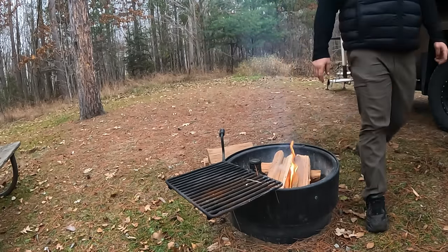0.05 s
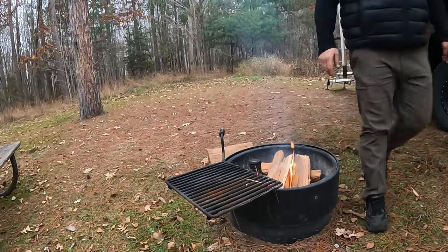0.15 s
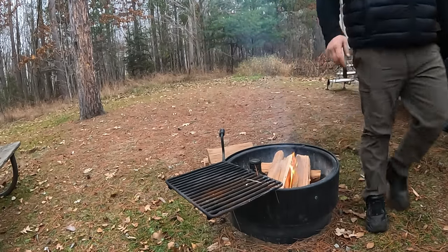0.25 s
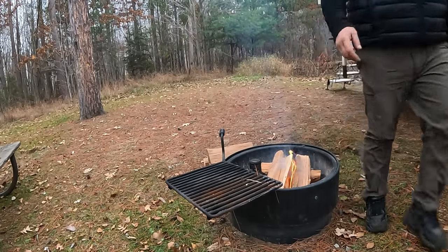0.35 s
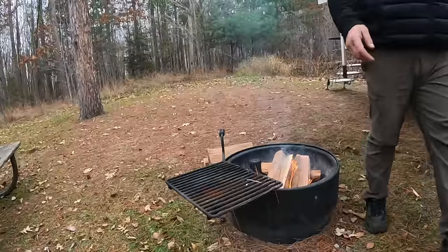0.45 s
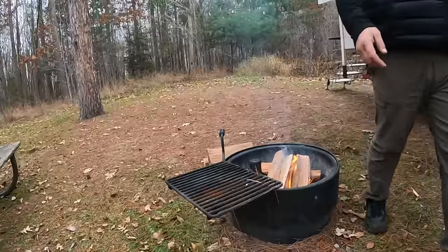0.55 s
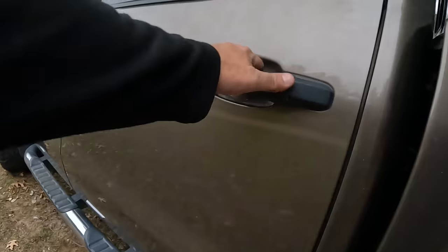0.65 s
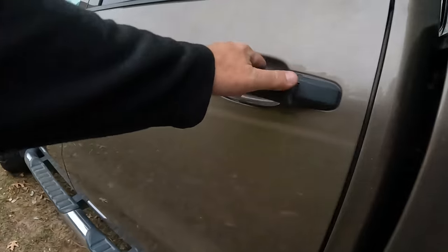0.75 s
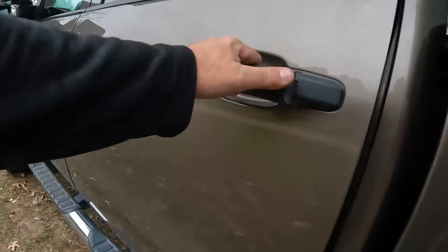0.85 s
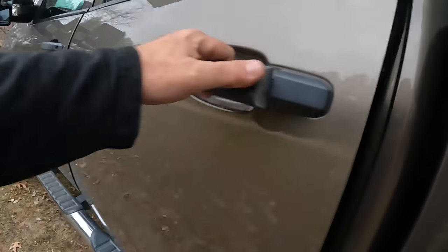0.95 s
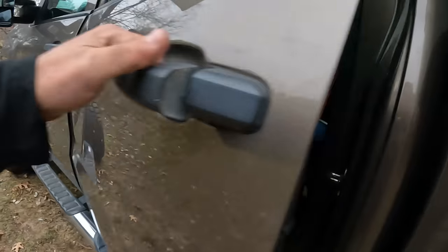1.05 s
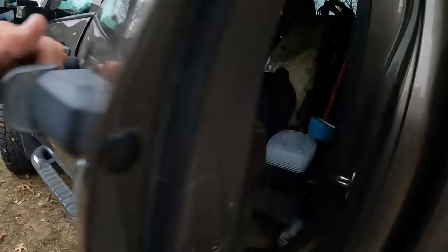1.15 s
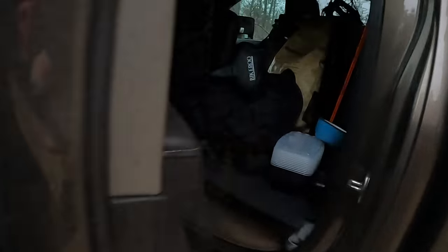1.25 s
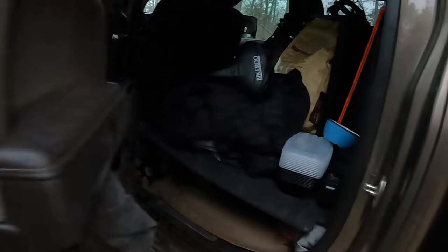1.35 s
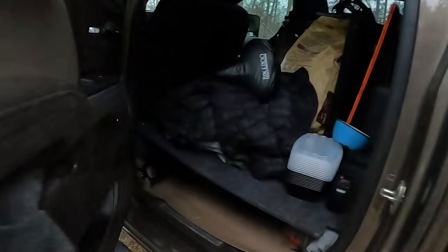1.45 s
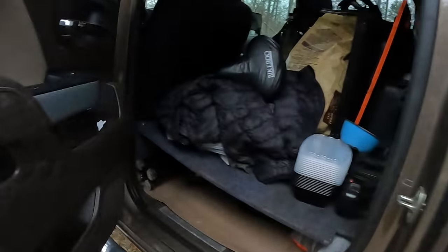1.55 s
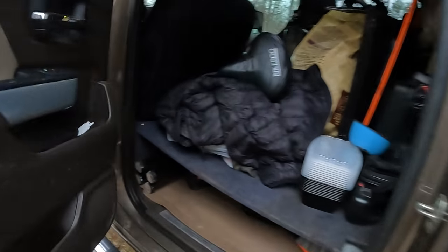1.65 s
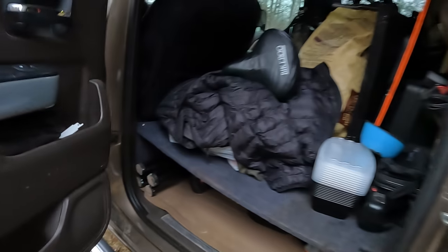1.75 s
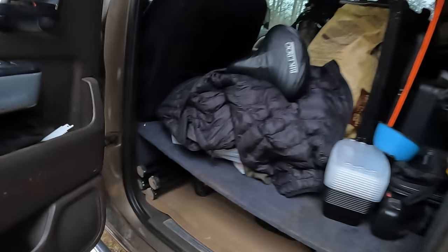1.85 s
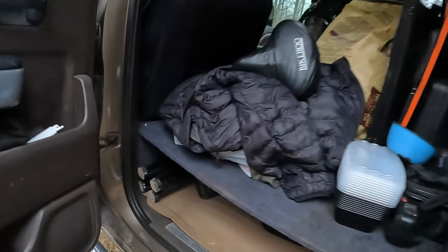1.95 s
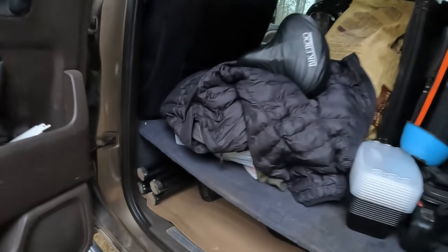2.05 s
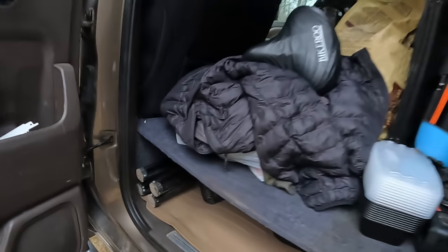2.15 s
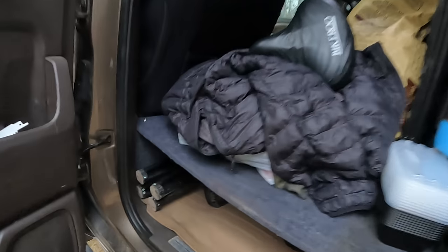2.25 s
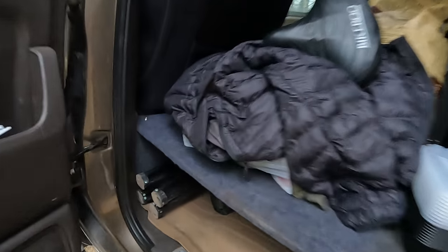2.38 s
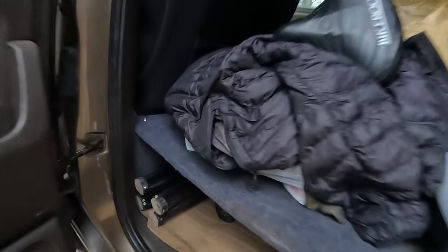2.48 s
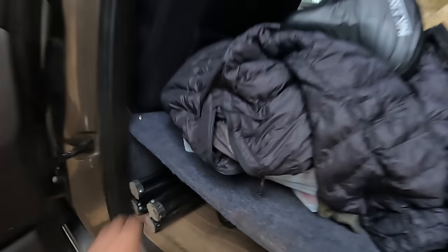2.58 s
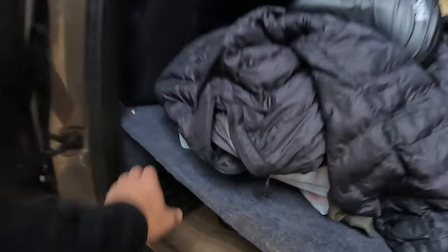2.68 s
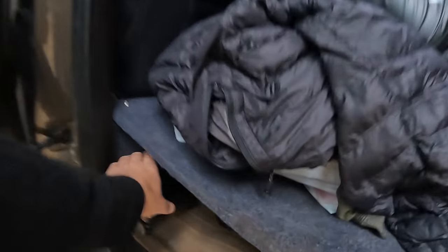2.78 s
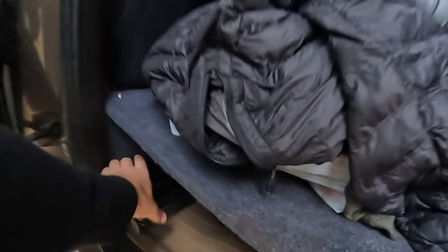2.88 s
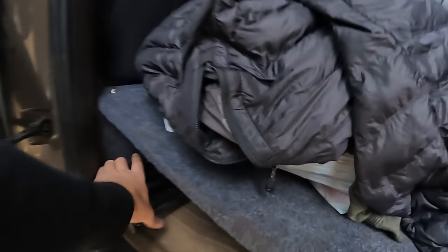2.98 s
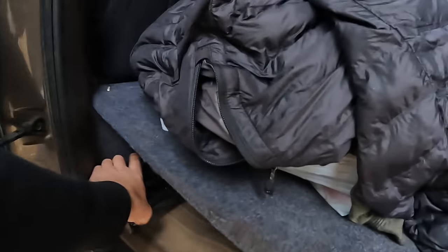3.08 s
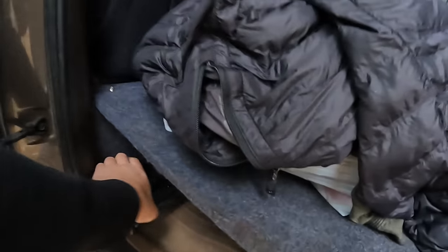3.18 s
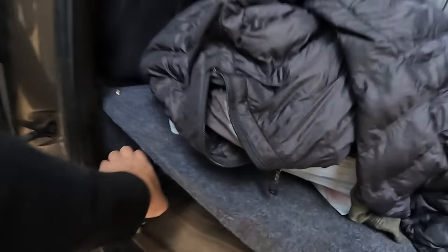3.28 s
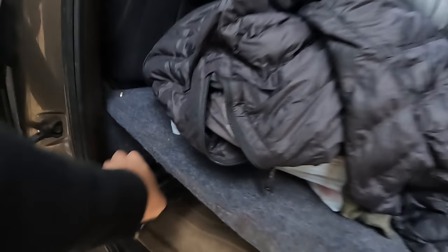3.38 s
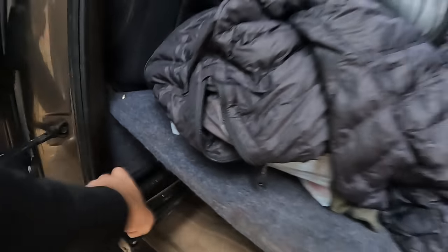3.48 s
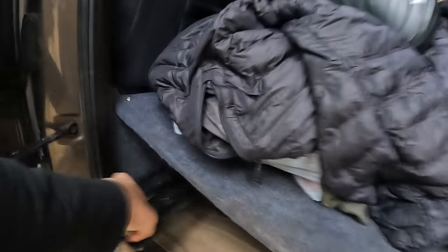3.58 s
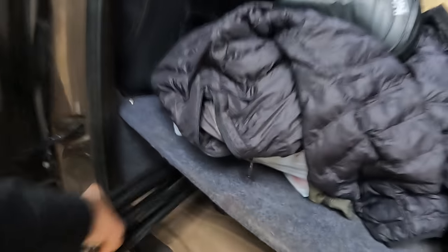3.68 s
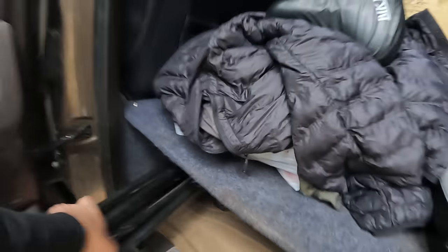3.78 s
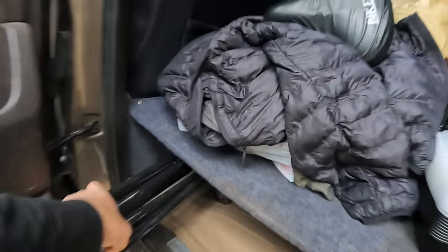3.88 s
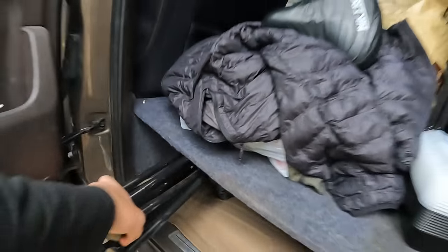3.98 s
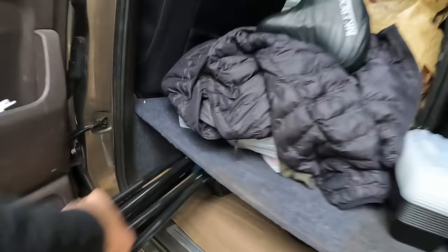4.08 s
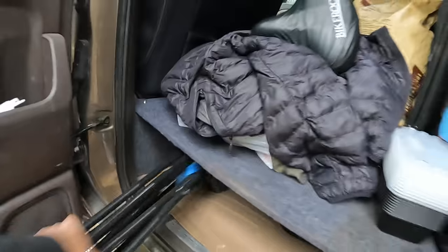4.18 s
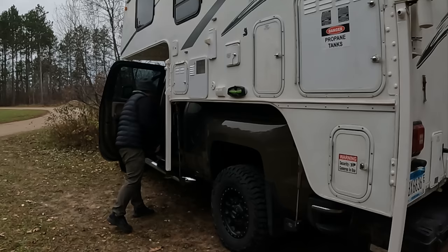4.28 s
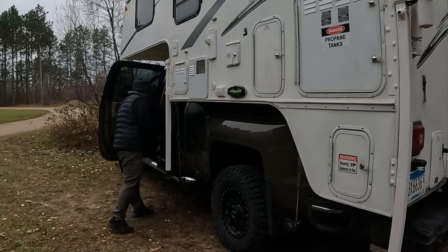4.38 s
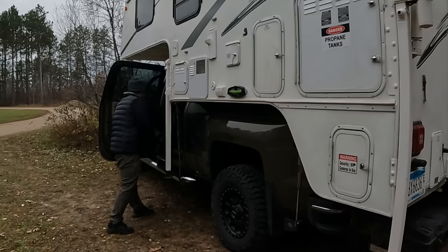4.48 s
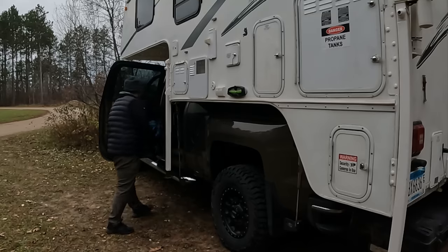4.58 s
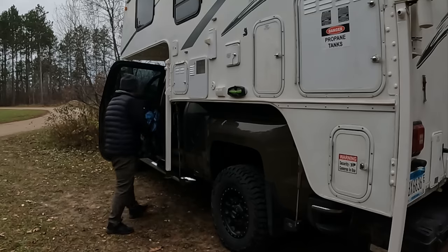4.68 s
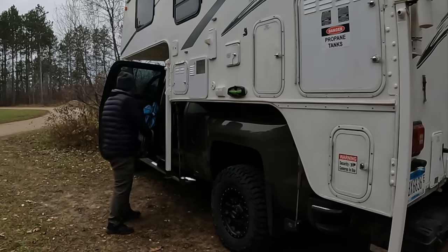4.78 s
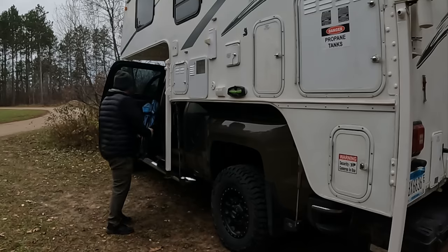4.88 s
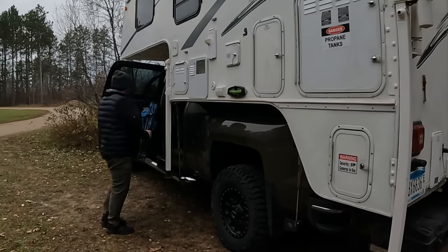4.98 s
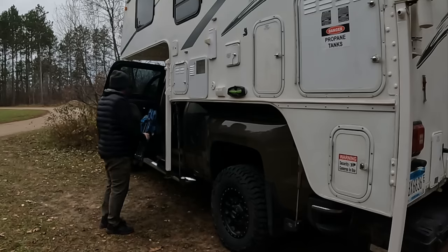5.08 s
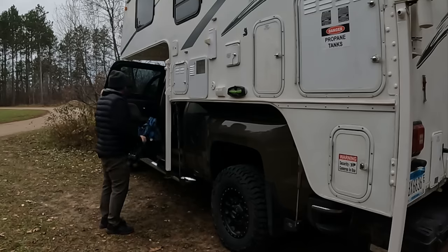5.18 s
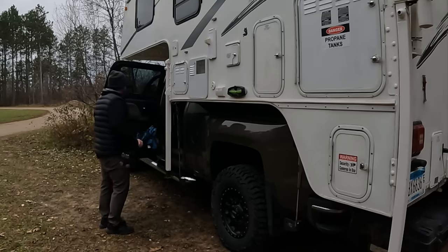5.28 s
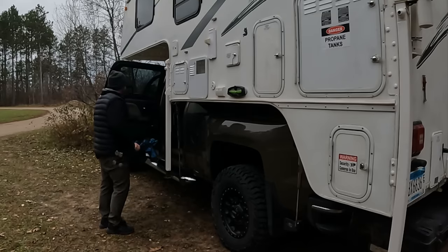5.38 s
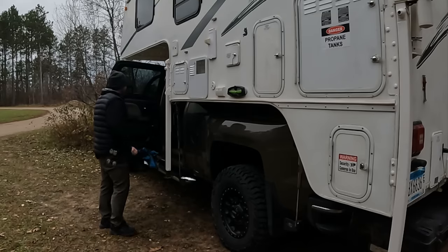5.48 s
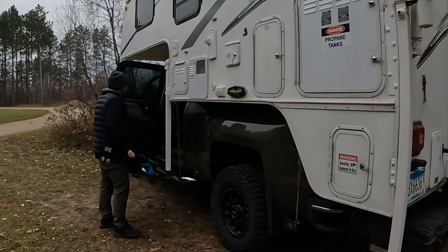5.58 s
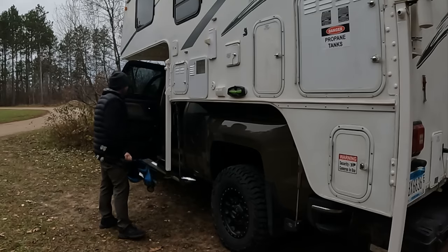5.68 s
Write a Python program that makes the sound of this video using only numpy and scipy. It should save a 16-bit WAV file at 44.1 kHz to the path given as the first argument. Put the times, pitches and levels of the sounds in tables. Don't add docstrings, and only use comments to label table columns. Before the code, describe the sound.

A vehicle door unlatches with a heavy clunk, swings to its stop, then metal poles are dragged out, bumping and clacking amid rustling cloth.

```python
import sys
import numpy as np
from scipy import signal
from scipy.fft import rfft, irfft
from scipy.io import wavfile
from scipy.ndimage import uniform_filter1d

SR = 44100
rng = np.random.default_rng(int(sys.argv[2]) if len(sys.argv) > 2 else 0)


def int16_out(signal):
    q = np.round(np.clip(np.atleast_2d(signal).T, -1, 1) * 32767)
    wavfile.write(sys.argv[1], SR, q.astype(np.int16))


def decibels_to_gain(level_db):
    exponent = np.asarray(level_db, float) / 20
    return 10 ** exponent


N = 253178

# mode_hz, level_db, t60_s
DOOR = [(155, -4, 0.11), (162.3, -13, 0.17), (215, 7.5, 0.038), (301, 0, 0.066), (423, -2.5, 0.079),
        (580, 9, 0.022), (741, 0.5, 0.037), (810, 5.5, 0.04), (1240, -5, 0.083), (1323, 16.5, 0.014),
        (1670, 0, 0.032), (1890, 14, 0.019), (2300, 10, 0.055), (2970, 15.5, 0.016), (3780, -19, 0.012),
        (5000, 24, 0.061), (5300, -6, 0.041), (6300, -8, 0.048), (7400, -6, 0.026), (9300, 7, 0.019),
        (11500, -16, .015)]
# mode_hz, level_db, t60_s
POLES = [(185, 0, .08), (245, 0, .06), (320, -1, .09), (375, 2, .13), (480, 0, .04), (700, -4, .03),
         (1100, -3, .03), (1400, -1, .022), (1550, -6, .025), (2200, -4, .02), (2650, -2, .02),
         (3300, 0, .025), (4400, -2, .02), (4900, -4, .04), (6200, -3, .02), (7800, -1, .02),
         (10300, -3, .02), (12500, -7, .015), (9300, -6, .025), (8700, -8, .02)]
HEAVY_HZ, POLE_HEAVY_HZ, BRIGHT_HZ = (115, 500, 1800), (140, 500, 1800), (1800, 5500, 11500)
TICK_SOFTNESS = 0.6


def band(x, lo_hz, hi_hz, order=2):
    return signal.sosfilt(signal.butter(order, [lo_hz, hi_hz], "band", fs=SR, output="sos"), x)


def unit(x):
    return x / np.sqrt(np.mean(x ** 2))


def curve(s, values):
    return np.interp(np.arange(N) / SR, s, values)


def on_log(hz, table):
    table_hz, table_db = np.transpose(table)
    return np.interp(np.log(hz), np.log(table_hz), table_db)


def walk(rate_hz):
    k = int(SR / rate_hz)
    held = np.repeat(rng.standard_normal(N // k + 1), k)
    return 1.3 * uniform_filter1d(uniform_filter1d(held, k), k)[:N]


def swells(table, roundness):
    hop = 64
    s, db, rise_s, fall_s, colour_db = np.transpose(table)[:, :, None]
    late_s = np.arange(0, N, hop) / SR - s
    db = db - 10 * np.abs(late_s / np.where(late_s < 0, rise_s, fall_s)) ** roundness
    return [(decibels_to_gain(v) ** 2).sum(axis=0).repeat(hop)[:N] for v in (db, db + colour_db)]


def blows(table, body, edges_hz, contact_ms, rattle_db, dense_db, dense_decay, reach, ring=1, softness=1):
    softer_ms_per_db = 0.2648
    length = 9000
    out, t = np.zeros(N + length), np.arange(length) / SR
    hz, db, t60_s = np.transpose(body)[:, :, None]
    heard = ((hz >= edges_hz[0]) & (hz < edges_hz[-1]))[:, 0]
    hz, db, t60_s = hz[heard], db[heard], t60_s[heard]
    dying = decibels_to_gain(db) * np.exp(-np.log(1000) * t / np.abs(ring * t60_s))
    for s, low_db, low_hz, high_db, high_hz in table:
        sign = np.sign(rng.standard_normal(hz.shape))
        detune = 1 + 0.027 * rng.standard_normal(hz.shape)
        modes = dying * sign * np.sin(2 * np.pi * hz * detune * t)

        length_ms = contact_ms - softness * softer_ms_per_db * (max(low_db, high_db) + 8.5)
        fade = t[:3000] / (max(length_ms, 0.2) / 1000)
        contact = rng.standard_normal(len(fade)) * decibels_to_gain(rattle_db) * np.sqrt(fade) * np.exp(-fade)
        contact[0] += 1

        hiss = rng.standard_normal(length)
        start = int(s * SR)
        parts = zip((low_db, high_db), (low_hz, high_hz), edges_hz, edges_hz[1:])
        for level_db, place_hz, lo, hi in parts:
            near = ((hz >= lo) & (hz < hi)) / (1 + (np.log2(hz / place_hz) / reach) ** 2)
            dense_top_hz = min(place_hz * (1 + 2 * reach), 11500)
            dense = decibels_to_gain(dense_db) * unit(band(hiss, place_hz / (1 + reach), dense_top_hz, order=1)) / 10
            height = hi / edges_hz[1]
            dense = dense * height ** 0.54 * np.exp(-t * dense_decay * np.sqrt(height))
            sound = signal.fftconvolve(contact, (near * modes).sum(axis=0) + dense)[:length]
            sound = band(sound, lo * 0.7, min(hi * 1.014, 18000), order=3)
            peak = np.sqrt(uniform_filter1d(sound ** 2, size=220).max())
            out[start:start + length] += sound * decibels_to_gain(level_db - 4.0) / peak
    return out[:N]


def taps(table):
    return [(s, db - 22.5, 415, db, hz) for s, db, hz in table]


def judder(table, tones, rate_hz, scatter_db):
    chance = rng.random((2, N))
    size = decibels_to_gain(-scatter_db * np.log(chance[1] + 0.0093)) * rng.standard_normal(N)
    slips = (chance[0] < rate_hz / SR) * size
    voice = 0
    for hz, width_hz, db in tones:
        voice = voice + decibels_to_gain(db) * unit(band(slips, hz - width_hz / 2, hz + width_hz / 2, order=1))
    return np.sqrt(swells(table, roundness=0.89)[0]) * unit(voice)


def latch_rows():
    # start_s, thud_db, thud_hz, knock_db
    latch = [(0.788, -42, 200, -34.5), (0.806, -39, 183, -40), (0.842, -11, 256, -17.5),
             (0.848, -9, 453, -12.5), (0.853, -20, 144, -32), (0.869, -27, 280, -31),
             (0.879, -39, 400, -34), (0.897, -41, 157, -40), (0.919, -40, 360, -35), (0.944, -46, 350, -35),
             (0.975, -58, 164, -43)]
    return [(*row, 570) for row in latch]


def stop_rows():
    # start_s, thud_db, thud_hz, knock_db
    stop = [
        (1.476, -39.5, 362, -62),
        (1.494, -42.5, 358, -46),
        (1.555, -42, 369, -37),
        (1.565, -49, 194, -35.5),
        (1.582, -44, 450, -21),
        (1.587, -18.5, 400, -17.5),
        (1.596, -21.5, 265, -41),
        (1.608, -29, 270, -38),
        (2.118, -47, 406, -66),
    ]
    return [(*row, 680) for row in stop]


def pole_rows():
    # start_s, thud_db, thud_hz, knock_db
    thuds = [(3.246, -31.5, 242, -44.5), (3.302, -34.5, 370, -37.5), (3.309, -26, 169, -34.5),
             (3.405, -20.5, 300, -39), (3.414, -18, 410, -29), (3.453, -24.5, 234, -37.5),
             (3.472, -17.5, 370, -34), (3.501, -24.5, 287, -40), (3.601, -34, 208, -36.5),
             (3.632, -31.5, 215, -39.5), (3.8096, -11.5, 230, -42), (3.823, -20, 196, -29),
             (3.85, -16, 230, -31), (4.127, -26, 247, -46), (4.207, -26, 215, -38.5),
             (4.238, -34, 192, -46), (4.292, -45, 184, -48), (4.4, -24, 244, -40), (4.421, -30, 215, -37.5),
             (4.549, -34, 244, -35)]
    # start_s, thud_db, thud_hz, knock_db, knock_hz
    clacks = [(3.6696, -23.5, 240, -27.5, 1400), (3.9303, -19, 290, -29.5, 1090),
              (4.058, -31, 414, -37, 1400), (4.146, -21, 215, -39, 1540), (4.27, -40, 424, -39, 1500),
              (4.385, -24.5, 392, -29.5, 1360), (4.437, -29.5, 447, -41, 1260), (4.506, -32, 258, -42, 950),
              (4.584, -32.5, 348, -36, 1040)]
    return [(*row, 613) for row in thuds] + clacks


def door_blows(table, ring):
    return blows(table, DOOR, HEAVY_HZ, contact_ms=2.96, rattle_db=-19.5, dense_db=4.5,
                 dense_decay=40, reach=0.57, ring=ring)


def door():
    # start_s, thud_db, thud_hz, knock_db, knock_hz
    rebounds = [
        (0.893, -33, 152, -44, 700),
        (0.918, -36.5, 380, -46, 600),
        (0.927, -45, 380, -43, 1700),
        (1.672, -34.5, 400, -39.5, 620),
        (1.692, -38, 385, -43, 600),
        (1.73, -45, 430, -50, 900),
        (1.8, -47, 430, -44.5, 590),
    ]
    return door_blows(latch_rows(), 0.67) + door_blows(stop_rows(), 0.45) + door_blows(rebounds, 0.36)


def door_ticks():
    # start_s, crack_db, crack_hz, tick_db, tick_hz
    ticks = [
        (0.664, -63, 5000, -57, 8350),
        (0.702, -49, 1970, -66, 5690),
        (0.753, -56, 1890, -55, 9150),
        (0.7902, -44, 3000, -58, 9850),
        (0.847, -34.5, 2480, -55, 5870),
        (0.857, -37.5, 2300, -64, 6050),
        (1.161, -67, 5170, -54, 9760),
        (1.5823, -22.5, 3000, -27, 6800),
        (1.5957, -37, 2290, -52, 5640),
        (2.5032, -44, 4500, -48, 5960),
    ]
    return blows(ticks, DOOR, BRIGHT_HZ, contact_ms=0.39, rattle_db=-13, dense_db=15.0,
                 dense_decay=120, reach=0.2, ring=0.37, softness=TICK_SOFTNESS)


def door_skin():
    start_s, level_db, pitch_hz, sag_hz_per_s = 1.622, -24, 217.3, 210
    rise_s, t60_s = 0.0098, 0.28
    t = np.maximum(np.arange(N) / SR - start_s, 0)
    shape = (1 - np.exp(-(t / rise_s) ** 2)) * np.exp(-np.log(1000) * t / t60_s)
    hz = (pitch_hz - sag_hz_per_s * np.minimum(t, 0.2)) * (1 + walk(30) / 20)
    return decibels_to_gain(level_db + 2.3 * walk(53.2)) * shape * np.sin(2 * np.pi * np.cumsum(hz) / SR)


def hinge():
    # start_s, level_db, rise_s, fall_s, colour_db
    groans = [
        (0.95, -53, .05, 0.15, 0),
        (1.15, -58, 0.19, 0.085, 0),
        (1.37, -57.5, 0.21, 0.11, 0),
        (1.5, -44, 0.012, .05, 0),
    ]
    # pitch_hz, width_hz, level_db
    tones = [(280, 33, -2), (372, 18, 3), (1100, 93, -6)]
    return judder(groans, tones, rate_hz=270, scatter_db=4.5)


def pole_bundle():
    # start_s, thud_db, thud_hz, knock_db, knock_hz
    bumps = [(3.058, -48, 295, -49.5, 587), (3.1, -46.5, 280, -51, 514), (3.181, -45, 453, -48, 550),
             (3.342, -40, 167, -52, 700), (3.364, -50, 400, -54, 754), (3.52, -33, 170, -55, 600),
             (3.562, -37, 347, -46, 540), (3.7, -31, 196, -36, 666), (3.752, -38, 400, -41, 514),
             (3.778, -43, 400, -44, 1060), (3.992, -37, 302, -45, 557), (4.3, -41, 202, -53, 1280),
             (4.465, -46, 425, -40, 760), (4.483, -32, 453, -36, 1400), (4.53, -40, 400, -33, 940),
             (4.645, -46, 397, -39, 1180), (4.674, -34.5, 472, -49, 520), (4.697, -39, 460, -38, 815),
             (4.803, -43, 199, -39, 1070)]
    heavy = blows(pole_rows(), POLES, POLE_HEAVY_HZ, contact_ms=1.2, rattle_db=-17.5, dense_db=6.0,
                  dense_decay=76, reach=0.3, ring=0.59)
    small = blows(bumps, POLES, POLE_HEAVY_HZ, contact_ms=0.83, rattle_db=-19.5, dense_db=1,
                  dense_decay=200, reach=0.092, ring=0.3)
    return heavy + small


def pole_ticks():
    # start_s, crack_db, crack_hz, tick_db, tick_hz
    tip_ticks = [(3.1768, -48.5, 4900, -42, 9800), (3.246, -58, 2420, -61, 9300),
                 (3.3003, -37, 2420, -49, 7770), (3.314, -38.5, 1770, -35, 7800),
                 (3.4186, -44, 2310, -46.5, 5840), (3.6685, -23, 3230, -28, 8640),
                 (3.8503, -32.5, 2470, -35.5, 6450), (3.929, -41.5, 2130, -41, 9700),
                 (4.0605, -39.5, 2690, -62, 6610), (4.2696, -40, 2430, -42, 5530),
                 (4.3849, -35, 2660, -43, 7300), (4.479, -41, 3930, -37.5, 6500)]
    # start_s, crack_db, crack_hz, tick_db, tick_hz
    finger_ticks = [(3.212, -51, 1700, -66, 6000), (4.819, -50, 3200, -40, 10000),
                    (3.025, -76, 5000, -62, 8000), (3.078, -50, 5200, -55, 5800)]
    tips = blows(tip_ticks, POLES, BRIGHT_HZ, contact_ms=0.78, rattle_db=-16.0, dense_db=22,
                 dense_decay=340, reach=0.34, ring=0.48, softness=TICK_SOFTNESS)
    fingers = blows(finger_ticks, POLES, BRIGHT_HZ, contact_ms=0.3, rattle_db=-27, dense_db=22,
                    dense_decay=410, reach=0.4, ring=0.4, softness=TICK_SOFTNESS)
    return tips + fingers


def pole_skid():
    # start_s, crack_db, crack_hz, tick_db, tick_hz
    slip = [
        (4.746, -32.5, 3730, -45.5, 5800),
    ]
    return blows(slip, POLES, BRIGHT_HZ, contact_ms=6.4, rattle_db=-13, dense_db=18,
                 dense_decay=97, reach=0.53)


def carried_poles():
    # start_s, knock_db, knock_hz
    knocks = [(4.743, -35, 1400), (4.86, -45, 765), (4.927, -31.5, 1080), (5.004, -28, 1470),
              (5.014, -34, 1530), (5.367, -34.5, 1500), (5.605, -37.5, 1350), (5.719, -33, 1110)]
    # start_s, crack_db, crack_hz, tick_db, tick_hz
    ticks = [(5.0044, -32.5, 2500, -29.5, 8450), (5.0144, -49, 2480, -42, 5530),
             (5.3672, -56, 1830, -63, 6220), (5.733, -55, 2970, -50, 8240)]
    low = blows(taps(knocks), POLES, HEAVY_HZ, contact_ms=1.2, rattle_db=-24.5, dense_db=12.5,
                dense_decay=116, reach=0.44, ring=0.29)
    high = blows(ticks, POLES, BRIGHT_HZ, contact_ms=1.1, rattle_db=-30, dense_db=21,
                 dense_decay=160, reach=0.65, ring=0.66)
    return low + high


def pole_drag():
    # start_s, level_db, rise_s, fall_s, colour_db
    pulls = [(3.56, -51, 0.11, 0.12, 0), (3.75, -44, 0.091, 0.15, 0), (4.0, -48.5, 0.024, .1, 0),
             (4.12, -39.5, 0.04, 0.13, 0), (4.35, -43.5, 0.19, 0.34, 0), (4.55, -39.5, 0.13, 0.11, 0),
             (4.85, -46, 0.13, 0.19, 0)]
    # pitch_hz, width_hz, level_db
    tones = [(230, 33, 0.5), (406, 25, 0), (439, 40, 4.5), (760, 15, -2.5), (1090, 76, -7), (1400, 53, 0),
             (1530, 48, -48), (2480, 66, -3.5)]
    return judder(pulls, tones, rate_hz=380, scatter_db=4.5)


def squeak():
    # start_s, pitch_hz, level_db
    glide = [(4.43, 5800, -80), (4.455, 6050, -57), (4.482, 6350, -52), (4.503, 6950, -52),
             (4.536, 7250, -49), (4.556, 7900, -57), (4.6, 8600, -75)]
    s, hz, db = np.transpose(glide)
    phase = 2 * np.pi * np.cumsum(curve(s, hz) * (1 + 0.012 * walk(300))) / SR
    return decibels_to_gain(curve(s, db) - 1 + 4.5 * walk(100)) * np.sin(phase)


def pings():
    # start_s, level_db
    strikes = [(3.177, -54), (3.315, -53), (3.669, -41), (3.93, -49), (4.78, -57), (4.93, -54)]
    ping_hz, beat_hz, t60_s = 9340, 140, 0.16
    out, rough_db = 0, 5 * walk(250)
    for s, db in strikes:
        t = np.maximum(np.arange(N) / SR - s, 0)
        pair = np.sin(2 * np.pi * ping_hz * t) + 0.38 * np.sin(2 * np.pi * (ping_hz - beat_hz) * t)
        out = out + decibels_to_gain(db - 60 * t / t60_s + rough_db) * pair
    return out


def lone_modes():
    # start_s, level_db, pitch_hz, t60_s
    door_modes = [(0.845, -14.5, 152, 0.12), (0.869, -22, 270, 0.087), (0.893, -28, 170, .14),
                  (1.3, -36, 400, .05), (0.926, -45, 1700, .06), (0.946, -38, 666, 0.043),
                  (1.5835, -10, 743, 0.047), (1.5825, -24, 3200, 0.033), (1.584, -21.5, 2310, 0.03),
                  (1.583, -22, 1120, 0.037), (1.583, -34, 5636, 0.026), (1.5925, -15, 249, 0.074),
                  (0.876, -29, 470, .04), (0.846, -24, 1250, 0.05)]
    # start_s, level_db, pitch_hz, t60_s
    trim_modes = [(2.309, -42, 1210, 0.031), (2.32, -49.5, 1310, 0.023), (2.357, -41, 1350, .025),
                  (2.377, -43, 1500, .02), (2.393, -44, 1400, .03), (2.435, -32, 617, 0.019),
                  (2.452, -31, 1750, 0.013), (2.503, -40, 4950, .015), (2.5065, -14.5, 577, 0.036),
                  (2.507, -20, 810, .022), (2.522, -35, 1420, 0.026)]
    # start_s, level_db, pitch_hz, t60_s
    pole_modes = [(3.247, -41, 1250, 0.028), (3.3, -31, 1260, 0.025), (3.319, -27, 190, 0.1),
                  (3.421, -33.5, 2900, .02), (4.061, -33, 1090, .04), (4.148, -38, 2580, .02),
                  (4.27, -38, 1550, .03), (3.599, -22, 556, 0.021), (3.62, -38, 1400, .04),
                  (3.669, -23, 3190, 0.028), (3.67, -24, 432, 0.046), (4.749, -31.5, 1850, 0.056),
                  (4.818, -32, 1100, 0.045), (4.845, -33, 1500, .02), (4.9253, -21, 1190, .012),
                  (4.973, -38, 715, 0.11), (5.006, -32, 2620, 0.046)]
    rise_cycles, length = 0.99, 8000
    out, t = np.zeros(N + length), np.arange(length) / SR
    for s, db, hz, t60_s in door_modes + trim_modes + pole_modes:
        shape = (1 - np.exp(-t * hz / rise_cycles)) * decibels_to_gain(db - 60 * t / abs(t60_s))
        start = int(s * SR)
        out[start:start + length] += shape * np.sin(2 * np.pi * hz * t)
    return out[:N] * decibels_to_gain(2.2 * walk(300))


def trim_and_twigs():
    # start_s, knock_db, knock_hz
    twigs = [
        (0.06, -53, 810),
        (0.373, -52.5, 780),
        (0.418, -54, 700),
    ]
    # start_s, knock_db, knock_hz
    trim = [(0.702, -39, 1280), (0.748, -40, 755), (1.911, -33, 710), (1.978, -49, 1000),
            (2.018, -44, 1367), (2.239, -41, 1160), (2.304, -43, 1390), (2.329, -34, 1190),
            (2.349, -36, 1180), (2.337, -44, 700), (2.377, -43, 600), (2.432, -34, 1170),
            (2.453, -31.5, 860), (2.487, -41, 1260), (2.5, -29, 1240), (2.5035, -20, 1400),
            (2.511, -28.5, 580), (2.515, -30, 570), (2.523, -42, 1300)]
    return blows(taps(twigs + trim), DOOR, HEAVY_HZ, contact_ms=0.99, rattle_db=-21.5, dense_db=5.0,
                 dense_decay=30, reach=0.52, ring=0.56, softness=0.94)


def shoe_scuff():
    # start_s, level_db, rise_s, fall_s, colour_db
    creaks = [
        (0.01, -54, .05, 0.045, 0),
        (0.14, -60, 0.082, 0.083, 0),
    ]
    # pitch_hz, width_hz, level_db
    tones = [(1350, 30, 0), (1600, 62, -2)]
    return judder(creaks, tones, rate_hz=270, scatter_db=2)


def shudder(table, below_db, t60_s):
    out = np.zeros((2, N))
    for s, thud_db, _, knock_db, _ in table:
        out[:, int(s * SR)] += decibels_to_gain(np.array([thud_db, knock_db]) + below_db) ** 2
    poles = np.exp(-2 * np.log(1000) / (np.array(t60_s) * SR))
    return np.array([signal.lfilter([1], [1, -pole], v) for v, pole in zip(out, poles)])


def rub_levels():
    # start_s, load_db, weight_db
    effort = [(0.0, -65.5, 3.5), (0.21, -68, -3), (0.61, -65, 0), (1.03, -59.5, 0), (1.5, -59.5, 1.5),
              (2.07, -64, 2.5), (2.3, -58, -7.5), (2.55, -54.5, -4), (3.24, -66.5, 5.5), (3.32, -49, 12.5),
              (3.55, -54, 13), (3.951, -56, 6.5), (4.179, -55, 7.5), (4.56, -51, 7), (4.72, -46, -8),
              (4.95, -40, -8), (5.12, -70.5, 10), (5.74, -56.5, -8.5)]
    # start_s, level_db, rise_s, fall_s, silk_db
    brushes = [
        (0.0, -50.5, 0.093, 0.083, -3.5),
        (0.16, -56, 0.12, 0.036, -7),
        (0.53, -54.5, 0.041, 0.042, -4),
               (0.65, -57.5, 0.039, 0.22, -3), (1.3, -60, 0.48, 0.18, -0.5), (1.62, -52.5, 0.07, 0.18, 0.8),
               (1.76, -56, 0.057, 0.13, -7.5), (1.99, -62.5, 0.26, 0.089, -0.5),
               (2.2, -60.5, 0.065, 0.073, -2), (2.49, -53, 0.24, 0.43, -9), (2.75, -54.5, 0.38, 0.15, 0.5),
               (3.05, -68.5, 0.26, 0.12, 7), (3.32, -58.5, 0.062, 0.14, 1.5),
               (3.45, -50.5, 0.034, 0.98, -7.5), (3.68, -44.5, 0.061, 0.16, -6),
               (3.84, -44, 0.077, 0.037, -1), (3.9, -47.5, 0.058, 0.016, -6),
               (4.12, -48, 0.071, 0.69, -5.5), (4.5, -45, 0.37, 0.26, 1), (4.78, -44, 0.035, 0.085, -2.5),
               (5.0, -45, 0.34, 0.1, -0.5), (5.199, -46, 0.075, 0.076, -3.5), (5.338, -54, 0.1, 0.1, -4),
               (5.488, -52, 0.069, 0.047, -3), (5.62, -55.5, 0.14, 0.038, -3.5),
               (5.74, -55.5, 0.091, 0.14, -7)]
    still_db, still_silk_db, stroke_body_db = -63, -68.5, -7
    door_shudder = shudder(latch_rows() + stop_rows(), below_db=(-26, -37), t60_s=(0.32, 0.36))
    pole_shudder = shudder(pole_rows(), below_db=(-26, -25), t60_s=(0.03, 0.26))
    thud, knock = door_shudder + pole_shudder
    s, load_db, weight_db = np.transpose(effort)
    scrape, silk = swells(brushes, roundness=2.2)
    weight = decibels_to_gain(curve(s, load_db + weight_db)) ** 2 + thud
    load = decibels_to_gain(curve(s, load_db)) ** 2 + knock + decibels_to_gain(stroke_body_db) ** 2 * scrape
    return 10 * np.log10([weight, load, scrape + decibels_to_gain(still_db) ** 2, silk + decibels_to_gain(still_silk_db) ** 2])


def rubbing():
    # centre_hz, band_level_db
    colour = [(120, -18.5), (180, -1.5), (280, -2), (420, -1), (600, -3.5), (1000, -2), (1400, -2.5),
              (2200, -3.5), (4000, -2.5), (9000, -2), (12000, -9), (15500, -9)]
    centres_hz = (200, 900, 3200, 8500)
    levels_db = rub_levels()
    grain_db = 2.6 * np.minimum(rng.exponential(size=N // 40 + 1), 4)
    grains = unit(rng.standard_normal(N) * decibels_to_gain(grain_db).repeat(40)[:N])
    out, shared_db = 0, 1.3 * walk(60)
    for hz in 125 * 2 ** np.arange(0, 7.1, 1 / 3):
        place = np.interp(np.log(hz), np.log(centres_hz), np.arange(4))
        below = min(int(place), 2)
        db = levels_db[below] + (place - below) * (levels_db[below + 1] - levels_db[below])
        db = db + on_log(hz, colour)
        flicker_db = 2.26 * (200 / max(hz, 200)) ** 0.43 * walk(18)
        fibres = grains * 0.95 + rng.standard_normal(N) * 0.44
        out = out + decibels_to_gain(db + shared_db + flicker_db) * unit(band(fibres, hz / 1.2, hz * 1.2))
    return out


def wind():
    # start_s, level_db, rise_s, fall_s, depth_db
    jolts = [(0.0, -65, .1, .1, -9), (0.853, -38, 0.007, 0.04, -14), (1.49, -47, 0.0077, 0.057, -2),
             (1.61, -50, .04, 0.2, -8), (1.78, -66, 0.24, 0.044, 16), (3.31, -40, 0.049, 0.026, -24),
             (3.37, -62, .05, .16, 4), (3.93, -48, 0.11, .08, -8), (4.16, -60, 0.22, 0.057, -15),
             (4.43, -40, 0.029, 0.047, -25), (4.57, -49, 0.062, 0.34, -22), (5.45, -56.5, 0.46, 0.1, -11)]
    calm_hum_db, calm_buffet_db = -68, -80
    jolt, depth = swells(jolts, roundness=0.63)
    buffet = unit(band(rng.standard_normal(N), 29, 54))
    hum = unit(band(rng.standard_normal(N), 65.5, 127))
    return np.sqrt(depth + decibels_to_gain(calm_buffet_db) ** 2) * buffet + np.sqrt(jolt + decibels_to_gain(calm_hum_db) ** 2) * hum


def scene():
    mid = door() + door_ticks() + door_skin() + hinge()
    mid += pole_bundle() + pole_ticks() + pole_skid() + carried_poles()
    mid += pole_drag() + squeak() + pings() + lone_modes()
    mid += trim_and_twigs() + shoe_scuff() + rubbing() + wind()
    return np.array([mid, mid])


def band_limit(x):
    return signal.sosfilt(signal.butter(12, 16470, fs=SR, output="sos"), x)


def record(dry):
    # pitch_hz, level_db_per_hz
    hiss_colour = [(24, 14), (40, 0), (611, -8), (1620, -13), (1840, -8), (2190, -10), (3700, -6),
                   (15800, -12.5)]
    top_hz = 15830
    hz = np.maximum(np.fft.rfftfreq(N, 1 / SR), 1)
    loudness = uniform_filter1d(band(dry[0], 2000, 12000) ** 2, size=2048) ** 0.3
    hiss = unit(irfft(rfft(rng.standard_normal(N)) * decibels_to_gain(on_log(hz, hiss_colour)), N))
    side = decibels_to_gain(-40.0 + 2.0 * walk(15)) * loudness * hiss
    low_pass = signal.ellip(10, 0.3, 60, top_hz, fs=SR, output="sos")
    mix = signal.sosfilt(low_pass, dry + np.array([side, -side]))
    return band_limit(mix)


dry = scene()
out = record(dry)
int16_out(out)
```